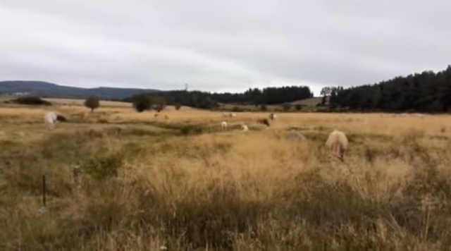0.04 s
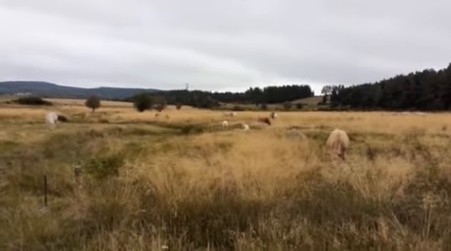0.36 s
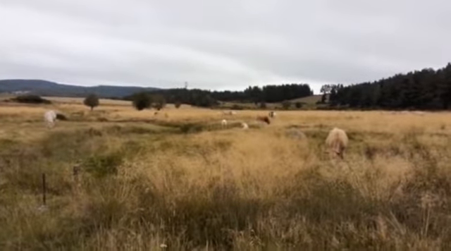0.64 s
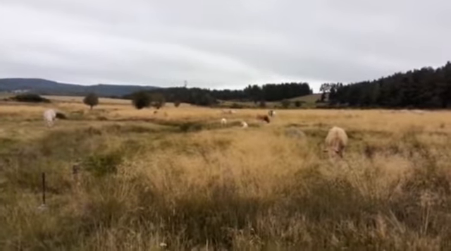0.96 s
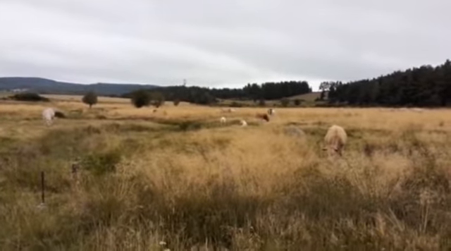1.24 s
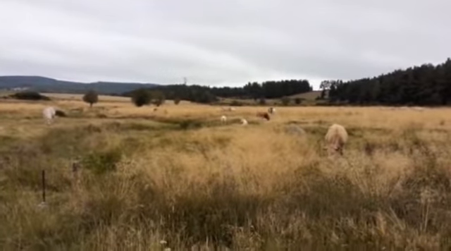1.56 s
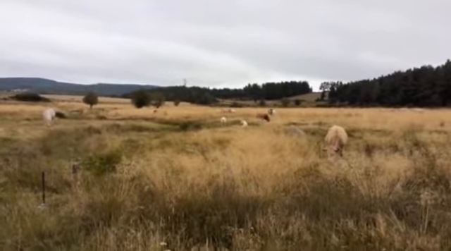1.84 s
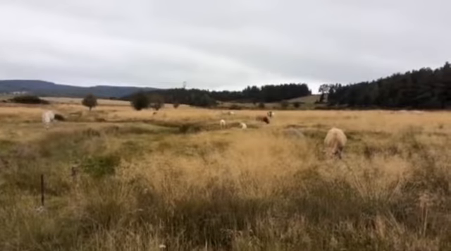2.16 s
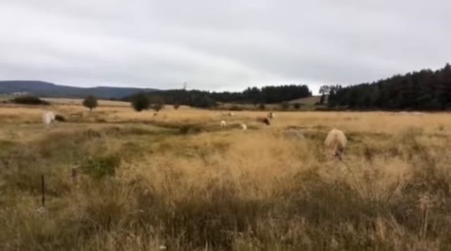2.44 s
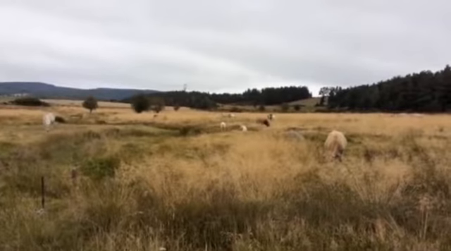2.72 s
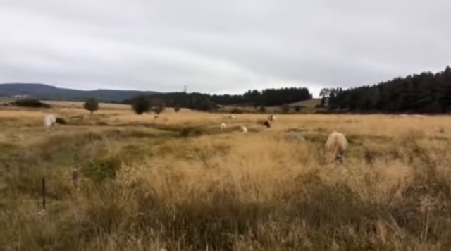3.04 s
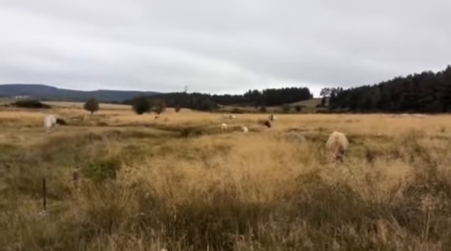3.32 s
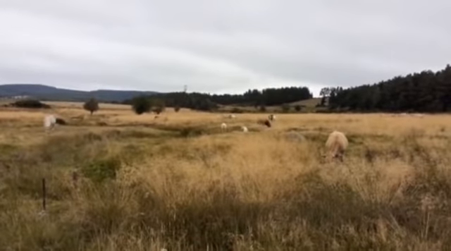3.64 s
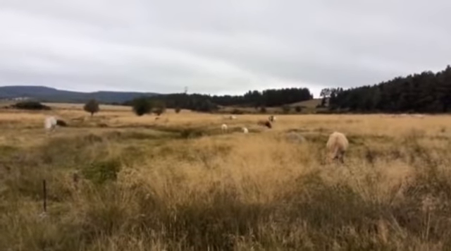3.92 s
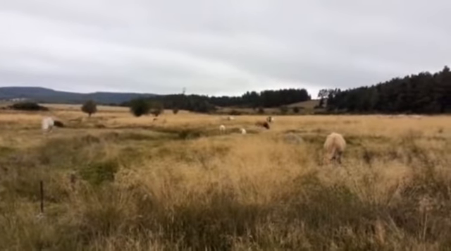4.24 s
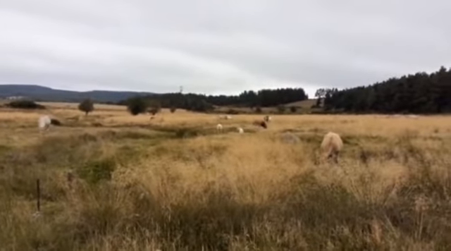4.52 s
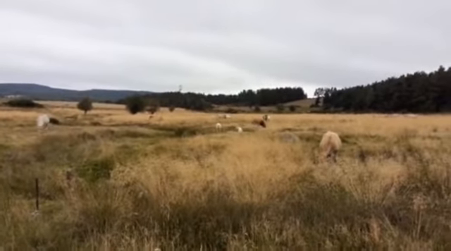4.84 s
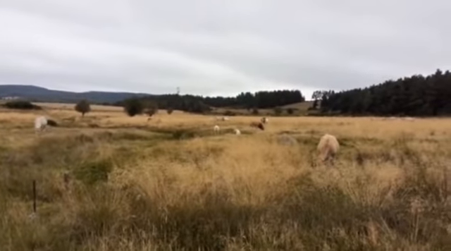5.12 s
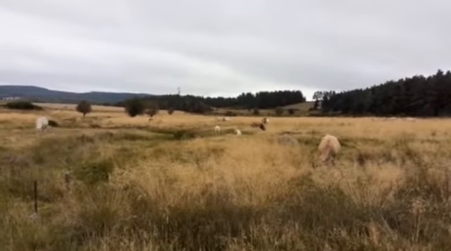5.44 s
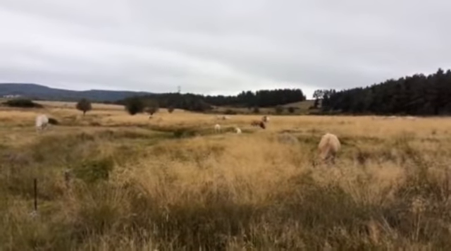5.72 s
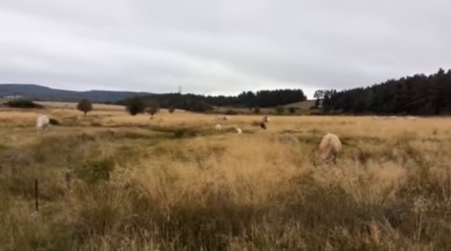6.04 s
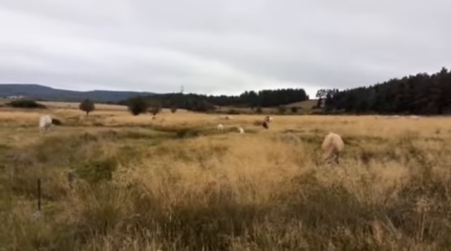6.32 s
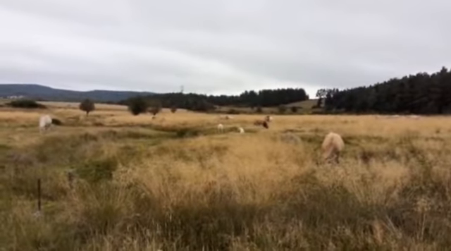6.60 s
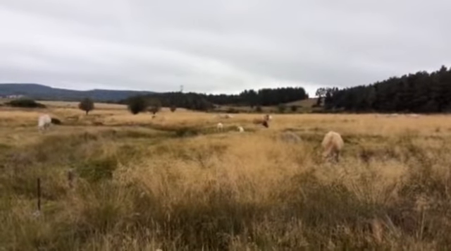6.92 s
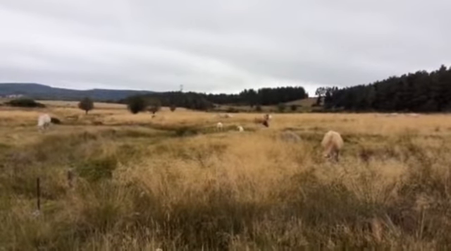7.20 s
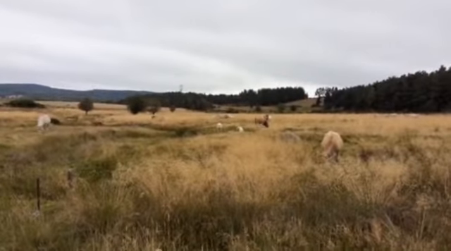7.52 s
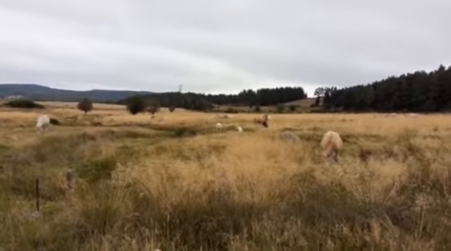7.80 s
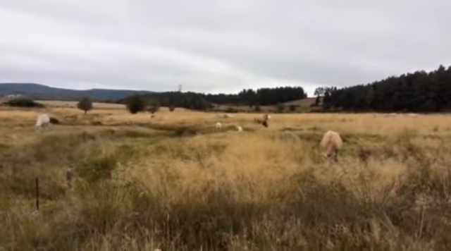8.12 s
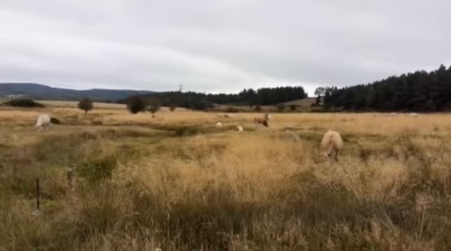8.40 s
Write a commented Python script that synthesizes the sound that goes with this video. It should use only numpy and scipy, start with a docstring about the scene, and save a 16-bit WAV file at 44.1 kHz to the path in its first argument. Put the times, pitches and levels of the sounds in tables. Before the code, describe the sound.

Irregular clanking and ringing of a sheet-metal cowbell over rushing wind, faint farther bells and low gusts buffeting the microphone.

```python
"""A sheet-metal cowbell swings on a grazing cow: the clapper clanks, rattles and checks the ring.
Around it is the even rush of a windy pasture, with dry grass crackling, one hollow knock
and two more bells, faint. Every bell sounds as a set of struck, decaying modes.
Gusts rumble and thump on the two microphone ports, each on its own."""
import sys
import numpy as np
from scipy import signal
from scipy.fft import rfft, irfft, next_fast_len
from scipy.io import wavfile
from scipy.ndimage import uniform_filter1d

SR = 44100
rng = np.random.default_rng(int(sys.argv[2]) if len(sys.argv) > 2 else 0)


def log_audio(samples):
    """Write samples as a 16-bit WAV file to the path given in sys.argv[1]."""
    # one column per channel
    frames = np.atleast_2d(samples).T
    # limit to full scale, then quantise
    limited = np.clip(frames, -1, 1)
    pcm = np.round(limited * 32767).astype(np.int16)
    wavfile.write(sys.argv[1], SR, pcm)


N = 381906
TIME = np.arange(N) / SR


def gain_of(db):
    """Decibels to amplitude."""
    return 10 ** (np.asarray(db) / 20)


def unit_rms(x):
    """Scales to rms 1."""
    return x / np.sqrt(np.mean(x ** 2) + 1e-20)


def curve_at(points, hz):
    """Interpolates a table on a log-frequency axis."""
    f, value = np.transpose(points)
    return np.interp(np.log(hz + 1), np.log(f + 1), value)


def smooth_noise(shape, *widths):
    """Noise of rms 1, box-averaged along its first axis once per width."""
    x = rng.standard_normal(shape)
    for width in widths:
        x = uniform_filter1d(x, size=width, axis=0)
    return unit_rms(x)


def add(mix, start_s, sound):
    """Mixes a sound in at start_s."""
    part = mix[max(round(start_s * SR), 0):][:len(sound)]
    part += sound[:len(part)]


def at_ports(left, right, lag_s=14 / SR):
    """Sound from the field reaches the right port just after the left."""
    return np.array([left, np.interp(TIME - lag_s, TIME, right)])


def scatter(x, t60_s=0.75):
    """Quick reflections from the ground and the animal."""
    t = np.arange(SR // 2) / SR
    taps = rng.standard_normal((2, len(t))) * (rng.random((2, len(t))) < .05) * gain_of(-60 * t / t60_s)
    taps /= np.linalg.norm(taps, axis=1, keepdims=True)
    return signal.fftconvolve(x, taps, axes=1)[:, :N]


# Lowest mode, swelling and checked as the bell swings: t/s, level/dB
HUM_LEVEL = [(0, -46.5), (.56, -52), (.61, -75), (.84, -70), (.97, -52), (1.298, -55.5), (1.312, -37.5),
             (1.57, -44.5), (1.63, -59), (1.87, -54), (2.02, -44), (2.35, -60.5), (3.665, -61),
             (3.685, -41), (3.78, -46), (3.87, -64), (3.95, -49), (4.03, -41), (4.26, -50.5), (4.32, -62),
             (4.41, -44), (4.8, -55), (4.97, -50), (5.02, -61), (5.13, -63), (5.24, -43), (5.39, -52),
             (5.52, -45), (5.7, -44), (5.965, -48.5), (5.98, -37.5), (6.3, -39.5), (6.66, -49.5),
             (6.83, -41.5), (7.32, -44.5), (7.77, -60), (7.95, -48.5), (8.25, -61), (8.28, -44.5),
             (8.55, -41), (8.66, -39)]


def hum(hz=1470, wander_hz=0.96, roughness=0.18, lag_rad=0.81):
    """The bell's lowest mode: a nearly pure tone, wavering in pitch and level."""
    angle = 2 * np.pi * np.cumsum(hz + wander_hz * smooth_noise(N, 4000)) / SR
    level = gain_of(np.interp(TIME, *np.transpose(HUM_LEVEL))) * (1 + roughness * smooth_noise(N, 300))
    return np.sqrt(2) * level * np.cos([angle, angle - lag_rad])


# Clapper blows: t/s, strength/dB, hardness/dB (+ sharp hit, - soft push), then the landing spot:
# seam/dB, lip/dB, corner/dB (+ nearer), wall/dB (+ front, - back)
BLOWS = [(0.001, -54.5, -4.0, 13.5, 12.5, -3.5, -3), (0.04, -55, -8, 16.5, 17.0, 9.0, 8),
         (0.344, -59, -4.5, 4.5, 16, 17, 4.0), (0.399, -52.0, -3, 2, 18.5, 27, 5),
         (0.483, -51.5, -4.0, 13, 13, 11.0, -2), (0.574, -51.5, -6.0, 17, 10, 15, -1),
         (0.877, -49.5, -5.5, 11, 10, 12.5, 6), (0.987, -53, 3.5, 9.5, 6, 4.5, 6.5),
         (1.031, -50, 0.5, 8, -2.5, 10, 6), (1.305, -39.5, 2.0, 7.5, 4, 7.5, 3.5),
         (1.427, -51.0, -9, 10, 2, 4.5, 4.0), (1.532, -42, -11, 25, 8.5, 10.5, 6),
         (1.543, -44.0, 0.5, 2, 3, 30.0, 9.5), (1.581, -41.5, 1, 3.5, 10, 12.0, 0.5),
         (1.869, -48.5, -3.5, 1, 8, 10.5, 16), (1.953, -50.0, -7, 4.5, 10, 14, 15),
         (3.448, -55, 2, 3, 9, 4.5, -2), (3.673, -46.5, 0.5, 0.5, 6, 14, 8),
         (3.771, -47.5, -4, 6, 4, -1.5, 6), (4.043, -53.5, -2.0, 10, 15.5, 9.5, -1),
         (4.293, -47.5, 1, 19, 16, 7, 4.5), (4.323, -42.0, 1.5, 9.5, 7.5, 1.5, 0.5),
         (4.389, -45, -6.5, 0, 0.5, 10, 4.5), (4.464, -47.5, -15.5, 10, 3, 11, 4),
         (4.671, -44.0, -3.5, 12.0, 6.5, 8.0, 5), (4.745, -50.5, -6.5, 12.0, 1, 8, 3),
         (4.95, -47.5, 2, 18.5, 15, 5, -1.0), (4.984, -44.5, -1.5, 25.5, 9, 1, 7),
         (5.493, -37.0, -6, 14, 11, 8.0, 12.5), (5.602, -41.5, -5.5, 8, 3.5, -2.5, 1),
         (5.692, -47.5, 0.5, 8, 1, 10.5, -3.5), (5.968, -41, -2, 4.5, 13.5, 4.5, -5),
         (6.04, -44.5, -4.5, 13.5, 5.5, -2.5, -18.5), (6.082, -44.5, -10, 10, 0, -1, 4),
         (6.731, -47.5, -2, 19.5, 20, 10.5, -6), (7.323, -44, 6.5, 23.5, 4, 10.0, 2),
         (7.865, -53, -0.5, 13, 9, 3, 7.5), (8.258, -44.5, -5.5, -2, 14.0, 12.5, 2),
         (8.383, -48.5, -1, 1, 17, 0.0, 9.5)]


def blow_levels_db(feed):
    """Level per blow. A feed is offset/dB, then one weight per dB column of BLOWS."""
    return feed[0] + np.array(BLOWS)[:, 1:] @ np.array(feed[1:])


def mode_family(mode_hz, modes, feed, spread_db, lag_rad, chatter, build_s, flutter):
    """Each blow restarts or checks a group of modes; between blows they decay freely."""
    step_s, contact_s = .0005, .06
    t = np.arange(0, TIME[-1] + step_s, step_s)
    starts = np.transpose(BLOWS)[0]
    last_blow = np.maximum(np.searchsorted(starts, t, "right") - 1, 0)
    age_s = np.maximum(t - starts[last_blow], 0)[:, None]
    hz = np.array(mode_hz)
    db, t60_s, pan_db = np.transpose(modes)
    # each landing spot shares the energy differently
    share = gain_of(db + spread_db * rng.standard_normal((len(starts), len(hz))))
    size = share / np.linalg.norm(share, axis=1, keepdims=True) * gain_of(blow_levels_db(feed))[:, None]
    # phase jumps as far as a blow adds energy
    still_ringing = np.vstack([0 * hz, size[:-1] * gain_of(-60 * np.diff(starts)[:, None] / t60_s)])
    jolt = np.sqrt(np.clip(1 - (still_ringing / size) ** 2, 0, 1))
    phase = np.cumsum(jolt * rng.uniform(-np.pi, np.pi, size.shape), 0)
    ring = (size * np.exp(1j * phase))[last_blow] * gain_of(-60 * age_s / t60_s)
    # build-up over a few quick bounces
    pole = np.exp(-step_s / build_s)
    ring = signal.lfilter([1 - pole], [1, -pole], ring, axis=0)
    # clapper rattling on the wall
    rattle = smooth_noise(ring.shape, 7) + 1j * smooth_noise(ring.shape, 7)
    ring *= 1 + chatter * np.exp(-age_s / contact_s) * rattle
    # bell turning and brushing the neck
    sway = smooth_noise(ring.shape, 50, 25) + 1j * smooth_noise(ring.shape, 50, 25)
    ring *= (1 + flutter * sway) / np.sqrt(1 + 2 * flutter ** 2)
    # the swing shifts all pitches together
    detune = 0.00048 * rng.standard_normal(len(starts))
    drift_s = np.cumsum(detune[last_blow]) * step_s
    ring *= np.sqrt(2) * np.exp(2j * np.pi * drift_s[:, None] * hz)
    out = np.zeros((2, N))
    for k in range(len(hz)):
        angle = (2 * np.pi * (hz[k] * TIME % 1)).astype(np.float32)
        tone = np.interp(TIME, t, ring[:, k]) * (np.cos(angle) + 1j * np.sin(angle))
        left, right = unit_rms(gain_of([pan_db[k] / 2, -pan_db[k] / 2]))
        out[0] += left * tone.real
        out[1] += right * (tone * np.exp(-1j * lag_rad)).real
    return out


# Clapper contact: f/Hz, relative density/dB
CLANK_SPECTRUM = [(1000, 0), (2200, 17.5), (3200, -2), (3900, 21), (4600, -2), (5900, 5), (7100, 10),
                  (8400, -4), (9100, 4), (9900, -15), (11000, 1.5), (15500, 5)]
# offset/dB, six blow weights
CLANK_FEED = (-5.5, 0.93, 0.5, 0.18, 0.23, 0.2343, 0)


def clank(fall_s=0.025, rattle_db=5.0, colour_db=8.0):
    """The clapper chatters on the wall: a brief rasp, coloured by the weak modes each blow wakes."""
    out, t = np.zeros((2, N)), np.arange(8192) / SR
    hz = np.fft.rfftfreq(len(t), 1 / SR)
    envelope = np.sqrt(2 * t / fall_s) * np.exp(.5 - t / fall_s)
    for (start_s, *_), level_db in zip(BLOWS, blow_levels_db(CLANK_FEED)):
        colour = gain_of(curve_at(CLANK_SPECTRUM, hz) + colour_db * smooth_noise(len(hz), 24, 16))
        rattle = unit_rms(gain_of(rattle_db * smooth_noise(len(t), 200)))
        contact = rng.standard_normal((2, len(t))) * rattle
        rasp = unit_rms(irfft(rfft(contact) * colour))
        for port in range(2):
            add(out[port], start_s, gain_of(level_db) * envelope * rasp[port])
    return out


# Cowbell mode families, low to high. *_HZ: f/Hz. *_FEED: offset/dB, six blow weights.
# *_MODES: relative level/dB, t60/s, left over right/dB
RING_HZ = [2502, 2510, 2589, 2608, 2650]
RING_MODES = [(-6, 1.8, -4), (5.5, 1.56, 0.5), (-9.5, 1.33, 0), (0, 1.204, -3), (-11.5, 2.1, 24)]
RING_FEED = (7.5, 1.0063, -0.62, -0.047, -0.0858, 0.1441, -0.06)
CLANG_HZ = [3768, 3785, 3820, 3838]
CLANG_MODES = [(-3.5, 0.45, -1.5), (2, 0.6, -1), (-6, 0.3, -2.5), (-7, 0.18, 4)]
CLANG_FEED = (8.5, 1.13, 0, 0.6131, -0.32, 0.23, 0.18)
TANG_HZ = [4120, 8064]
TANG_MODES = [(0, .4, -10), (-3, .2, 1.5)]
TANG_FEED = (-1.8, 0.92, 0.3, 0.14, 0.24, -0.43, -0.027)
BRASS_HZ = [5276]
BRASS_MODES = [(0, 0.51, -6)]
BRASS_FEED = (-16, 0.84, 0.5, 0.4874, -0.0855, 0.0365, 0.93)
BLARE_HZ = [5835, 5862]
BLARE_MODES = [(-0.74, 0.28, -16), (-0.26, 0.276, -7)]
BLARE_FEED = (-11.5, 0.88, 0.66, 0.45, 0.14, 0.74, -0.14)
PING_HZ = [6968, 6985, 7001]
PING_MODES = [(6, 0.24, -2), (5, 0.28, -4.5), (-1, 0.277, -5)]
PING_FEED = (19, 1.0649, 1.1, -0.1169, -0.0527, 0.05, 0.01)
SIZZLE_HZ = [8848, 8876, 9030, 9500]
SIZZLE_MODES = [(12, 0.268, 2.5), (16, 0.22, 1.9), (7.5, 0.12, 2.5), (-7.5, 0.16, 2)]
SIZZLE_FEED = (-12, 0.92, 0.52, 0, 1.09, 0.2039, 0.29)
SHIMMER_HZ = [10347, 10718, 10860, 10945, 10972]
SHIMMER_MODES = [(-5.5, 0.28, 5.7), (-2, 0.2, 6.5), (-7, 0.24, 5), (-1, 0.154, 6.7), (4, 0.23, 5)]
SHIMMER_FEED = (-12, 0.99, 0.9, 0.304, 0.81, 0.31, -0.22)
GLINT_HZ = [12161, 12180, 13238, 14266, 15180, 15700]
GLINT_MODES = [(5, 0.23, 14), (-3, .18, 7), (-4, .18, 9), (-10, 0.19, 6.6), (-13, 0.16, 2.5),
               (-20, 0.17, 2)]
GLINT_FEED = (-13.5, 0.9, 1.1, 0.2544, 0.4, 0.7354, -0.4)


def cowbell():
    """Struck sheet metal and its reflections: hard blows feed the treble, soft ones the low ring."""
    low = hum()
    low += mode_family(RING_HZ, RING_MODES, RING_FEED,
                       spread_db=1.9, lag_rad=0.55, chatter=0.05, build_s=0.003, flutter=0.2)
    high = mode_family(CLANG_HZ, CLANG_MODES, CLANG_FEED,
                       spread_db=2.5, lag_rad=2.2, chatter=0.17, build_s=0.005, flutter=0.18)
    high += mode_family(TANG_HZ, TANG_MODES, TANG_FEED,
                        spread_db=2.0, lag_rad=1.85, chatter=0.25, build_s=0.009, flutter=0.25)
    high += mode_family(BRASS_HZ, BRASS_MODES, BRASS_FEED,
                        spread_db=0, lag_rad=1.78, chatter=0.2, build_s=0.0065, flutter=0.22)
    high += mode_family(BLARE_HZ, BLARE_MODES, BLARE_FEED,
                        spread_db=3.0, lag_rad=1.78, chatter=0.22, build_s=0.005, flutter=0.22)
    high += mode_family(PING_HZ, PING_MODES, PING_FEED,
                        spread_db=2.5, lag_rad=0.3, chatter=0.22, build_s=0.0035, flutter=0.18)
    high += mode_family(SIZZLE_HZ, SIZZLE_MODES, SIZZLE_FEED,
                        spread_db=3.0, lag_rad=0.92, chatter=0.35, build_s=0.0051, flutter=0.3)
    high += mode_family(SHIMMER_HZ, SHIMMER_MODES, SHIMMER_FEED,
                        spread_db=3.0, lag_rad=0.92, chatter=0.4, build_s=0.0055, flutter=0.3)
    high += mode_family(GLINT_HZ, GLINT_MODES, GLINT_FEED,
                        spread_db=4.0, lag_rad=0.98, chatter=0.35, build_s=0.0063, flutter=0.35)
    return low + high + clank() + gain_of(-15) * scatter(low) + gain_of(-20) * scatter(high)


# Field rush: f/Hz, relative density/dB
RUSH_SPECTRUM = [(100, -51), (300, -4), (410, -12.5), (540, -2), (800, -1), (1050, -1), (1700, 0.5),
                 (1950, 0), (2450, -2), (3100, -14), (5600, -12.5), (7600, -20), (10000, -26), (15500, -23)]
# t/s, level before trim/dB
RUSH_LEVEL = [(0, -45), (.45, -43.5), (.7, -50.5), (.95, -45), (2.4, -45), (2.8, -45.5), (3.3, -45),
              (4.9, -43.5), (5.08, -47.5), (5.3, -40.5), (7.1, -45.5), (7.48, -39.5), (7.701, -50.5),
              (8, -43.5)]
# f/Hz, left-right coherence
RUSH_COHERENCE = [(100, 1), (500, 0.74), (1500, 0.77), (2400, 1), (3500, 0.016), (7000, 0.031),
                  (15000, 0.054)]


def field_rush(trim_db=5.0, patchy_db=4.0, flicker_db=1.5, body_hz=1700):
    """Wind over grass and far trees: the body swells and flutters, the hiss stays even."""
    window, hop = 1024, 256
    frames, hz = N // hop + 5, np.fft.rfftfreq(window, 1 / SR)
    real, imag, own_real, own_imag, patches = rng.standard_normal((5, frames, len(hz)))
    patches = unit_rms(uniform_filter1d(uniform_filter1d(patches, size=5, axis=0), size=7, axis=1))
    level_db = np.interp(np.arange(frames) * hop / SR, *np.transpose(RUSH_LEVEL))
    swell_db = level_db - level_db.mean() + flicker_db * smooth_noise(frames, 4)
    body_db = swell_db[:, None] / (1 + (hz / body_hz) ** 2)
    coherence = curve_at(RUSH_COHERENCE, hz)
    left = real + 1j * imag
    right = coherence * left + np.sqrt(1 - coherence ** 2) * (own_real + 1j * own_imag)
    colour = gain_of(curve_at(RUSH_SPECTRUM, hz) + patchy_db * patches + body_db)
    spectra = np.array([left, right]) * colour
    _, rush = signal.istft(spectra.swapaxes(1, 2), nperseg=window, noverlap=window - hop)
    balance = gain_of([[-.8], [.8]])
    return at_ports(*unit_rms(rush[:, :N])) * balance * gain_of(level_db.mean() + trim_db)


# Gusts on the ports: t/s, length/s, left level/dB, right level/dB
GUSTS = [(0.03, 0.052, -32, -39), (0.7, 0.053, -37, -58), (0.945, 0.06, -43, -38),
         (1.287, 0.23, -36, -38.5), (1.625, 0.13, -57, -37.5), (1.866, 0.071, -37, -47),
         (2.686, 0.35, -45, -39), (2.957, 0.58, -32, -31), (3.582, 0.62, -34.5, -34.5),
         (3.98, 0.22, -36, -35), (4.666, 0.36, -40, -37), (5.093, 0.53, -31.5, -33),
         (5.204, 0.17, -31, -17.5), (5.77, 0.31, -33.5, -37), (6.12, 0.39, -26.5, -34.5),
         (6.49, 0.56, -39.5, -41), (7.252, 0.073, -25.5, -44), (7.835, 0.25, -46, -32.5),
         (8.158, 0.76, -37.5, -37)]


def wind_pressure(port, lull_db=-51, wander_db=5, wander_per_s=8, rise_s=0.066, fall_s=0.1):
    """Envelope at one port: light wandering air, plus gusts that swell, hold and die."""
    wander = np.interp(TIME * wander_per_s, np.arange(256), rng.standard_normal(256))
    power = gain_of(lull_db + wander_db * wander) ** 2
    for start_s, length_s, *ports_db in GUSTS:
        corners_s = np.cumsum([start_s - rise_s / 2, rise_s, max(length_s - rise_s, 0), fall_s])
        power += np.interp(TIME, corners_s, np.array([0, 1, 1, 0]) * gain_of(ports_db[port])) ** 2
    return np.sqrt(power)


# Port turbulence: f/Hz, relative density/dB
RUMBLE_SPECTRUM = [(15, -59), (35, -1), (60, 1.5), (100, 2), (140, -7), (200, -15.5), (300, -18),
                   (450, -34), (1000, -77), (3000, -90)]


def wind_rumble(lumpy_db=4.0):
    """Independent turbulence at each microphone port."""
    out, size = np.zeros((2, N)), next_fast_len(N, real=True)
    colour = gain_of(curve_at(RUMBLE_SPECTRUM, np.fft.rfftfreq(size, 1 / SR)))
    for port in range(2):
        lumps = uniform_filter1d(smooth_noise(N, 1600), size=400)
        turbulence = irfft(rfft(rng.standard_normal(size)) * colour, size)[:N]
        out[port] = unit_rms(turbulence * gain_of(lumpy_db * lumps)) * wind_pressure(port)
    return out


# Eddies: t/s, peak before trim/dB, f/Hz, port (0 left, 1 right)
EDDIES = [(0.052, -22.5, 118, 0), (1.325, -9, 98, 1), (1.674, -19, 94, 1), (3.066, -18, 108, 0),
          (5.241, -1, 150, 1), (5.263, 0.5, 132, 1), (5.28, -3, 158, 1), (5.516, -7, 138, 1),
          (5.533, -8.5, 89, 1), (6.147, -8, 106, 0), (6.355, -10, 115, 0), (7.288, -14, 112, 0)]


def eddy_thumps(cycles=0.65, steepness=0.39, trim_db=-1):
    """Single eddies strike one port for a cycle or two; steep fronts add an overtone."""
    out, t = np.zeros((2, N)), np.arange(-SR // 25, SR // 25) / SR
    for centre_s, db, hz, port in EDDIES:
        angle = 2 * np.pi * (hz * t + rng.random())
        eddy = np.cos(angle + steepness * np.sin(angle)) / np.cosh(2 * hz * t / cycles)
        add(out[port], centre_s + t[0], gain_of(db + trim_db) * eddy)
    return out


# Dry stems: t/s, level/dB, decay/s, centre f/Hz
STEMS = [(0.33, -31, .01, 1610), (0.44, -34, .006, 1690), (0.462, -34, 0.0091, 900),
         (0.5, -36, 0.0049, 1950), (0.731, -39.5, 0.011, 4600), (0.793, -42, 0.0019, 2400),
         (2.386, -30, 0.02, 1110), (2.427, -36.5, 0.0093, 4160), (4.118, -40, 0.029, 6600),
         (4.601, -39, 0.019, 5600), (6.567, -39.5, 0.0097, 5900), (8.076, -34, 0.015, 1630),
         (8.222, -35.5, 0.0021, 2160)]


def grass_crackle(snaps_per_sample=0.22, width_octaves=0.53):
    """Each stem breaks or brushes in a short clump of tiny snaps."""
    out, t = np.zeros(N), np.arange(8192) / SR
    hz = np.fft.rfftfreq(len(t), 1 / SR)
    for start_s, db, decay_s, centre_hz in STEMS:
        snaps = rng.standard_normal(len(t)) * (rng.random(len(t)) < snaps_per_sample)
        band = np.exp(-np.log2((hz + 1) / centre_hz) ** 2 / (2 * width_octaves ** 2))
        clump = unit_rms(irfft(rfft(snaps) * band))
        add(out, start_s, gain_of(db) * clump * np.exp(-t / decay_s))
    return at_ports(out, out)


# Hollow knock: f/Hz, level/dB, t60/s
KNOCK_MODES = [(630, -23, .06), (721, -27, .06), (818, -35, .05)]


def knock(start_s=.54, rise_s=0.00057):
    """One small, hollow knock: three fast-decaying modes."""
    out, t = np.zeros(N), np.arange(SR // 5) / SR
    ring = sum(gain_of(db - 60 * t / t60_s) * np.cos(2 * np.pi * hz * t) for hz, db, t60_s in KNOCK_MODES)
    add(out, start_s, ring * (1 - np.exp(-t / rise_s)))
    return at_ports(out, out)


# A farther bell and a thinner one. *_MODES: f/Hz, relative level/dB, t60/s. *_BLOWS: t/s, level/dB
FAR_MODES = [(2622, -6, 0.8), (3461, -4, .3), (4156, -5, 0.28), (5320, -6, 0.49), (6940, 1, 0.28),
             (6995, -3, .3), (7228, -6, .16), (7540, -9, 0.1), (8850, -7, 0.12)]
FAR_BLOWS = [(2.781, -47), (3.275, -45), (3.567, -50), (5.465, -43), (6.088, -44), (7.866, -49)]
THIN_MODES = [(2610, -2, .6), (2654, -1, .62), (3914, -5, .4), (4129, -11, .3), (7235, -11, .15),
              (9173, -4, .16), (10330, -16, .15), (10860, -12, .14)]
THIN_BLOWS = [(7.2, -42), (8.382, -43)]


def far_bell(modes, blows, spread_db=3.0, rise_s=0.00043, scatter_db=-5):
    """Another cow's bell, faint; each blow shares its energy differently among the modes."""
    out, t = np.zeros(N), np.arange(SR * 3 // 4) / SR
    hz, db, t60_s = np.transpose(modes)[:, :, None]
    tones = gain_of(db - 60 * t / t60_s) * np.sin(2 * np.pi * hz * t) * (1 - np.exp(-t / rise_s))
    for start_s, level_db in blows:
        add(out, start_s, gain_of(level_db + spread_db * rng.standard_normal(len(hz))) @ tones)
    direct = at_ports(out, out)
    return direct + gain_of(scatter_db) * scatter(direct)


def scene():
    """Three bells, the pasture and wind on the microphone."""
    bells = cowbell() + far_bell(FAR_MODES, FAR_BLOWS) + far_bell(THIN_MODES, THIN_BLOWS)
    return bells + field_rush() + grass_crackle() + knock() + wind_rumble() + eddy_thumps()


def record(dry, low_cut_hz=42, band_limit_hz=15800):
    """Microphone low cut, then recorder band limit."""
    thinned = signal.sosfilt(signal.butter(3, low_cut_hz, "high", fs=SR, output="sos"), dry)
    lowpass = signal.firwin(511, band_limit_hz, window=("kaiser", 9), fs=SR)
    return signal.oaconvolve(thinned, lowpass[None], "same")


dry = scene()
out = record(dry)
log_audio(out)
```